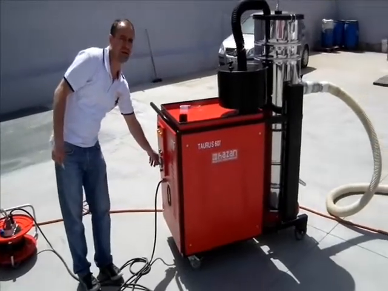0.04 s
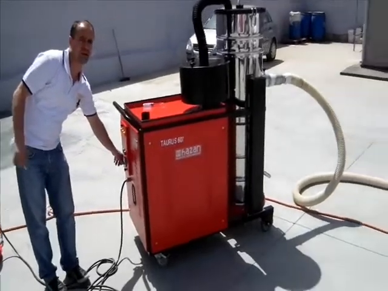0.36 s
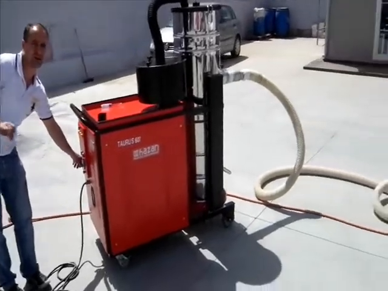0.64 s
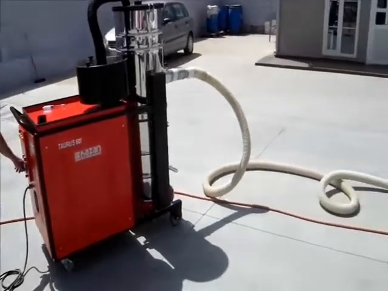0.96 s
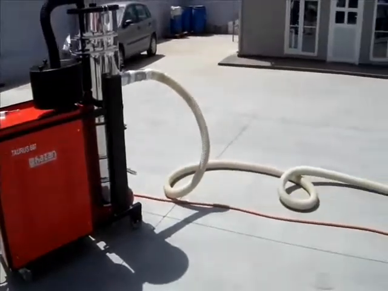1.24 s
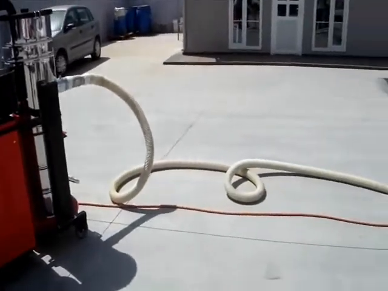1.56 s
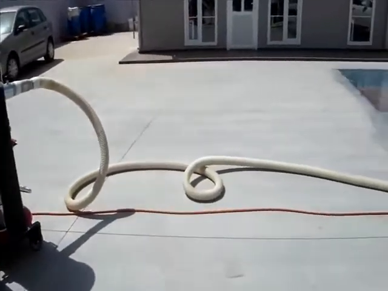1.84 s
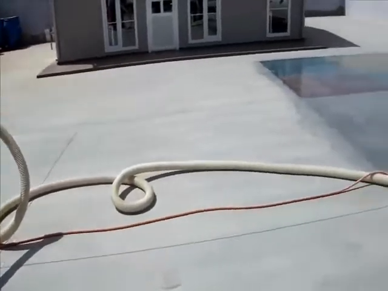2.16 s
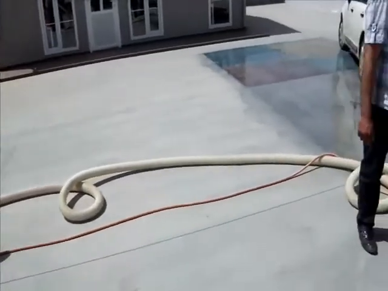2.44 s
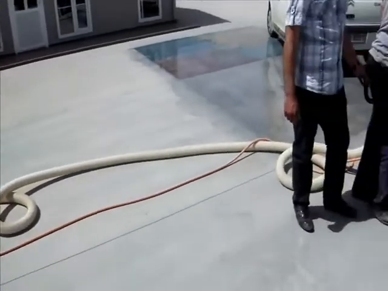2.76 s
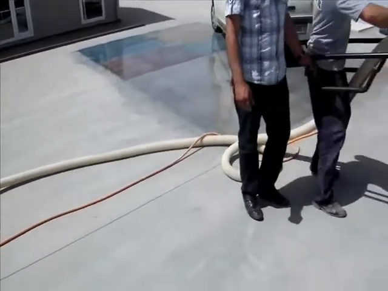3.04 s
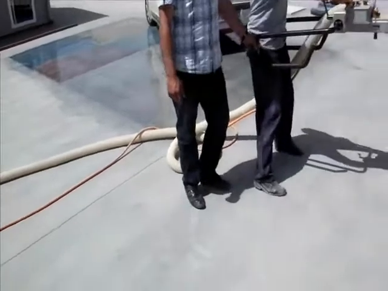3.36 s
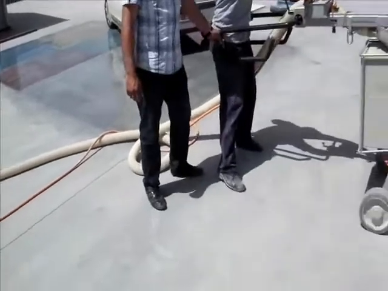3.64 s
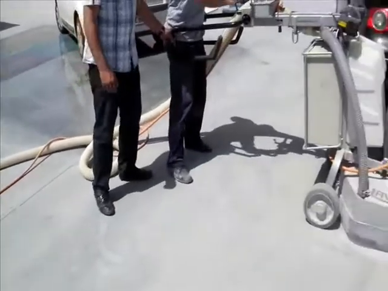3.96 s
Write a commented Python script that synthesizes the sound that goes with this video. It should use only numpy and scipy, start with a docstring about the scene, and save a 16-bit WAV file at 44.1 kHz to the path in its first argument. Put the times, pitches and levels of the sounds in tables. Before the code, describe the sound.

Floor grinder scraping and squealing over concrete, with the steady suction roar of an industrial vacuum.

```python
"""A floor grinder works a concrete yard while an industrial vacuum draws off the dust.
At first air rushes and moans in the hose over the grinder's rumble, and two faint notes fall away.
From 0.5 s the head bites in three spells, booming on the slab; its housing judders as the discs catch.
The carried microphone thuds softly as it pans from the vacuum to the grinder: the suction hiss fades,
and by 2 s the discs ring, rasp and squeal on the concrete under the thin whine of the drive."""
import sys
import numpy as np
from scipy import signal
from scipy.fft import rfft, irfft, next_fast_len
from scipy.io import wavfile
from scipy.ndimage import uniform_filter1d, map_coordinates

SR = 44100
rng = np.random.default_rng(int(sys.argv[2]) if len(sys.argv) > 2 else 0)


def materialize(psi):
    """Save the field psi as 16-bit PCM at rate SR to the path in sys.argv[1].

    A 1-D psi becomes a single channel; in a 2-D psi each row is a channel.
    """
    bounded = np.clip(np.atleast_2d(psi).T, -1, 1)
    quanta = np.round(bounded * 32767).astype(np.int16)
    wavfile.write(sys.argv[1], SR, quanta)


N = 176400
TIME_S = np.arange(N) / SR


def amp(db):
    """Decibels to gain."""
    return 10 ** (np.asarray(db) / 20)


def unit(x):
    """x at rms 1."""
    return x / np.sqrt(np.mean(x ** 2) + 1e-20)


def colour(points):
    """Response through (Hz, dB) points on a log axis."""
    points_hz, db = np.transpose(points)
    return lambda hz: amp(np.interp(np.log(hz + 1), np.log(points_hz + 1), db))


def resonances(modes):
    """Response of summed (Hz, width Hz, dB) modes."""
    return lambda f: sum(amp(db) * 1j * f * width / (hz * hz - f * f + 1j * f * width)
                         for hz, width, db in modes)


def steep_peak(hz, width_hz):
    """Response of two equal resonators in series."""
    return lambda f: resonances([(hz, width_hz, 0)])(f) ** 2


def curves(rows):
    """One value per sample for each column after the time."""
    times_s, *columns = np.transpose(rows)
    return [np.interp(TIME_S, times_s, column) for column in columns]


def wobble(rate_hz):
    """Smooth random curve, rate_hz knots a second."""
    knots = rng.standard_normal(int(N * rate_hz / SR) + 4)
    return map_coordinates(knots, [TIME_S * rate_hz])


def swell(peak_s, half_width_s):
    """Gaussian bump, 1 at peak_s."""
    return np.exp(-((TIME_S - peak_s) / half_width_s) ** 2)


def fuzzy_tone(hz, width_hz):
    """Tone of rms 1 whose pitch wanders quickly."""
    pitch_hz = hz + width_hz / 2 * wobble(2 * width_hz)
    return np.sqrt(2) * np.sin(2 * np.pi * (np.cumsum(pitch_hz) / SR + rng.random()))


def filtered(x, response):
    """x through a frequency response."""
    size = next_fast_len(N + SR // 2)
    return irfft(rfft(x, size) * response(np.fft.rfftfreq(size, 1 / SR)), size)[..., :N]


def shifted(x, hz):
    """x shifted in frequency by hz, one value per sample."""
    return np.real(signal.hilbert(x) * np.exp(2j * np.pi * np.cumsum(hz) / SR))


def rush(response, diffuse, patchy_db):
    """Stereo noise of rms 1 with patches of random gain; the diffuse share differs between channels."""
    spectra = signal.stft(rng.standard_normal((3, N)), nperseg=1024)[2]
    patches = uniform_filter1d(rng.standard_normal(spectra.shape[1:]), size=4, axis=0)
    patches = uniform_filter1d(patches, size=10, axis=1)
    noise = signal.istft(spectra * amp(patchy_db * unit(patches)), nperseg=1024)[1][:, :N]
    pair = np.sqrt(1 - diffuse) * noise[0] + np.sqrt(diffuse) * noise[1:]
    return unit(filtered(pair, response))


def placed(sound, lead_ms, left_db):
    """Mono or stereo sound with the left channel earlier by lead_ms and louder by left_db."""
    side = np.array([[0.5], [-0.5]])
    positions = np.arange(N) + side * lead_ms * SR / 1000
    pair = np.broadcast_to(sound, (2, N))
    delayed = [map_coordinates(channel, [at], mode="mirror") for channel, at in zip(pair, positions)]
    return np.array(delayed) * amp(side * left_db)


# Housing modes. Each row: frequency in Hz, width in Hz, gain in dB.
HOUSING_MODES = [(216, 16, -4.5), (254.3, 12.7, 2), (307, 80, -0.5), (393, 65, -1), (433, 13, 2.5),
                 (453, 11, -7)]
# Roll-off around the modes. Each row: frequency in Hz, gain in dB.
HOUSING_SKIRT = [(90, -18), (170, -6), (210, 3.5), (470, -3.5), (540, -9.5), (900, -32), (2000, -52)]


def housing(hz):
    """Response of the grinder's body."""
    return resonances(HOUSING_MODES)(hz) * colour(HOUSING_SKIRT)(hz)


# Rumble between bites. Each row: time in seconds, boom and housing gains in dB.
IDLE_LEVELS = [(0, -35.5, -36.5), (.3, -34, -31), (.54, -35, -27.5), (.6, -36.5, -26.5), (1.15, -37.5, -26),
               (1.42, -39.5, -30), (1.7, -42, -30.5), (1.9, -41.5, -28.5), (2.6, -41.5, -28.5),
               (2.85, -35, -28), (3.05, -38, -27), (3.2, -42, -30.5), (3.5, -41, -29), (3.85, -40.5, -27.5),
               (4, -40, -29)]
# Harder bites. Each row: start and end in seconds, boom and housing rises in dB.
BITES = [(0.526, 1.24, 6.5, -0.5), (1.77, 2.57, 8.5, 1.5), (3.274, 4.1, 10, 2)]
# Slab boom spectrum, then housing hum tones. Each row: frequency in Hz, gain in dB.
BOOM_SPECTRUM = [(30, -36), (55, -22), (68, -9.5), (78, -1), (95, -0.5), (120, -6), (170, -6), (230, -33),
                 (500, -62)]
HUM_TONES = [(215, -15), (252, -14), (385, -9), (437, -12)]


def rumble():
    """The head shakes its housing and booms on the slab; the boom rises while it bites."""
    ramp_s = 0.024
    boom_db, body_db = curves(IDLE_LEVELS)
    for start_s, end_s, boom_rise_db, body_rise_db in BITES:
        inside_s = np.minimum(TIME_S - start_s, end_s - TIME_S)
        bite = np.clip(inside_s / ramp_s + 0.5, 0, 1)
        boom_db += boom_rise_db * bite
        body_db += body_rise_db * bite
    boom = rush(colour(BOOM_SPECTRUM), diffuse=0.15, patchy_db=0.5)
    boom += amp(-7) * fuzzy_tone(79, width_hz=12)
    hum = sum(amp(db) * fuzzy_tone(hz, width_hz=13) for hz, db in HUM_TONES)
    flutter_db = 0.47 * wobble(24.63)
    body = rush(housing, diffuse=0.25, patchy_db=0.8) + hum
    sound = amp(boom_db - 1.5) * boom + amp(body_db - 0.16 + flutter_db) * body
    return placed(sound, lead_ms=0.03, left_db=3)


# Air rush. Each row: time in seconds, low and high band gains in dB.
AIR_LEVELS = [(0.0, -28.5, -30.5), (0.45, -30.5, -37.5), (0.62, -28, -34.5), (0.85, -31.5, -33.5),
              (1.08, -38.5, -32), (1.4, -37.5, -35.5), (1.72, -48, -35), (1.88, -29, -30), (2.15, -31, -30),
              (2.5, -33, -32.5), (2.9, -37, -35), (3.25, -35.5, -35.5), (3.35, -40, -31.5),
              (3.55, -33.5, -30.5), (3.7, -34, -32.5), (3.88, -29, -28.5), (4.0, -43, -35.5)]
# Suction hiss, fading with the pan. Each row: time in seconds, gain in dB.
SUCTION_LEVELS = [(0, -26), (.25, -25), (.6, -25.5), (1.1, -31.5), (1.6, -31.5), (4, -66)]
# Spectra of the two air bands and the hiss. Each row: frequency in Hz, gain in dB.
AIR_LOW_SPECTRUM = [(100, -20), (300, 0.5), (520, 2.5), (720, 0), (850, -6.5), (1300, -48)]
AIR_HIGH_SPECTRUM = [(550, -38), (780, 2), (900, 3), (1050, -2), (1250, -1.5), (1500, -4), (2200, -3.5),
                     (4000, -75)]
SUCTION_SPECTRUM = [(600, -12.5), (1200, 0), (1700, -0.5), (2200, -1.5), (2600, -0.5), (3100, -0.5),
                    (3700, -2.5), (4000, -1), (4400, 0), (4800, -7.5), (6500, -7), (7500, -22.5)]
# Hose resonances. Each row: frequency in Hz, width in Hz, gain in dB.
HOSE_MODES = [(723, 33, 2), (909, 61, 0), (1030, 42, -1.5)]


def vacuum():
    """Air rushes through the hose, sounds its resonances and hisses out of the machine."""
    low_db, high_db = curves(AIR_LEVELS)
    hiss_db, = curves(SUCTION_LEVELS)
    low = amp(low_db + 1) * rush(colour(AIR_LOW_SPECTRUM), diffuse=0.19, patchy_db=2)
    high = amp(high_db + 2) * rush(colour(AIR_HIGH_SPECTRUM), diffuse=0.62, patchy_db=3)
    hiss = amp(hiss_db + 2.5) * rush(colour(SUCTION_SPECTRUM), diffuse=0.98, patchy_db=3.5)
    hose = amp(high_db - 3.5) * rush(resonances(HOSE_MODES), diffuse=0.15, patchy_db=0.5)
    air = placed(low, lead_ms=0.21, left_db=2) + placed(high + hose, lead_ms=0.14, left_db=4)
    return air + placed(hiss, lead_ms=-0.11, left_db=4)


# Falling glide. Each row: time in seconds, base pitch in Hz, gain in dB.
FALLING_GLIDE = [(0, 144.2, -36.5), (.27, 143.8, -36), (.42, 136.5, -38), (.55, 130.5, -36),
                 (.68, 125.5, -41), (.9, 116, -56), (1.2, 113, -70)]
# The two notes. Each row: multiple of the base pitch, gain in dB.
FALLING_ORDERS = [(5, -6), (6, 0)]


def falling_notes():
    """Two faint notes glide down and vanish in the air rush."""
    base_hz, level_db = curves(FALLING_GLIDE)
    notes = sum(amp(db) * fuzzy_tone(order * base_hz, width_hz=7.9) for order, db in FALLING_ORDERS)
    return placed(amp(level_db) * notes, lead_ms=0.12, left_db=1)


# Disc ringing. Each row: time in seconds, low and high ring gains in dB.
RING_LEVELS = [(0.0, -41, -33), (0.4, -42, -31), (0.85, -35, -32), (1.08, -33.5, -29), (1.18, -32, -28.5),
               (1.4, -27.5, -25.5), (1.6, -31.5, -25.5), (1.8, -24.5, -24), (2.15, -29, -25),
               (2.5, -32, -26.5), (2.58, -26.5, -24.5), (2.7, -25.5, -23), (2.85, -28.5, -26),
               (2.97, -26, -26), (3.25, -28, -27), (3.45, -29.5, -28.5), (4.0, -33.5, -28.5)]
# Wander of the high ring. Each row: time in seconds, pitch in Hz.
RING_PITCH = [(0, 2230), (.7, 2190), (1.2, 2259), (2.5, 2240), (2.7, 2285), (3.0, 2252), (3.2, 2322),
              (3.4, 2225), (4, 2236)]
# Abrasive on concrete. Each row: time in seconds, rasp and fizz gains in dB.
ABRASION_LEVELS = [(0.0, -26, -45), (0.25, -27, -42.5), (0.6, -28.5, -38.5), (1.0, -28, -33),
                   (1.4, -26.5, -29.5), (1.75, -25, -28.5), (2.0, -25, -29), (2.26, -24.5, -28.5),
                   (2.36, -26.5, -30.5), (2.46, -25, -29.5), (2.7, -25, -29), (3.0, -23.5, -25.5),
                   (3.17, -25.5, -29.5), (3.45, -23.5, -28.5), (3.7, -24.5, -28.5), (4.0, -24, -31.5)]
# Abrasion spectra. Each row: frequency in Hz, gain in dB.
RASP_SPECTRUM = [(1200, -26), (1950, -4.5), (2550, -1.5), (3100, 1), (3400, 0), (3720, 0.5), (4050, -4.5),
                 (4400, -5.5), (4700, -19), (5600, -43)]
FIZZ_SPECTRUM = [(3500, -23), (4500, 2.5), (4900, 0), (5200, 1.5), (5400, 0), (5600, -0.5), (6000, -2),
                 (6600, -3), (7300, -10), (9000, -17), (14000, -15)]
# Direction of the discs. Each row: time in seconds, left lead in ms, base left-over-right in dB.
DISC_DIRECTION = [(0, 0.23, 12), (.6, 0.19, 16.5), (1.2, 0.23, 13), (1.35, 0.11, 13.5), (1.7, 0.075, 11),
                  (1.9, 0.026, 6.5), (2.3, 0.023, 7.5), (2.8, 0.067, 9.5), (3.15, 0.054, 8.5),
                  (3.4, 0.04, 7.5), (4, 0.039, 8.5)]


def grinding():
    """Abrasive scrapes the concrete in a fine uneven chatter and rings the discs."""
    low_hz, high_hz = 1687, 2248
    low_db, high_db = curves(RING_LEVELS)
    pitch_hz, = curves(RING_PITCH)
    rasp_db, fizz_db = curves(ABRASION_LEVELS)
    lead_ms, left_db = curves(DISC_DIRECTION)
    low = amp(low_db - 4) * rush(steep_peak(low_hz, width_hz=280), diffuse=0.32, patchy_db=1.5)
    high = amp(high_db - 2.5) * rush(steep_peak(high_hz, width_hz=325), diffuse=0.37, patchy_db=1.1)
    rings = low + shifted(high, pitch_hz - high_hz)
    rasp = amp(rasp_db + 2.5) * rush(colour(RASP_SPECTRUM), diffuse=0.42, patchy_db=1.5)
    fizz = amp(fizz_db + 0.63) * rush(colour(FIZZ_SPECTRUM), diffuse=0.3, patchy_db=2.7)
    chatter = amp(0.99 * wobble(220) + 0.29 * wobble(27))
    return chatter * (placed(rings, lead_ms, left_db + 4)
                      + placed(rasp, lead_ms, left_db - 3.5)
                      + placed(fizz, lead_ms, left_db + 2))


# Drive whine. Each row: time in seconds, gain in dB.
WHINE_LEVELS = [(0, -5), (1.05, -13), (1.4, -4), (1.75, 3), (2.05, 3), (2.5, 1), (3, 0), (3.45, 5), (4, 1)]


def drive_whine():
    """The thin, slightly unsteady tone of the drive in a halo of noise."""
    whine_hz, drift_hz = 5396, 4
    level_db, = curves(WHINE_LEVELS)
    tone = np.sin(2 * np.pi * np.cumsum(whine_hz + drift_hz * wobble(14)) / SR)
    flicker = amp([2.5 * wobble(11) for _ in range(2)])
    halo = amp(-0.5) * rush(steep_peak(whine_hz, width_hz=300), diffuse=0.17, patchy_db=-1.5)
    return placed(amp(level_db - 40) * (tone * flicker + halo), lead_ms=0.028, left_db=14)


# Top hiss spectrum. Each row: frequency in Hz, gain in dB.
TOP_HISS_SPECTRUM = [(13500, -40), (14400, -22), (14800, -6), (15300, -2), (15700, 0), (15900, -10)]


def top_hiss():
    """A thin steady hiss near 15.5 kHz."""
    hiss = amp(-42) * rush(colour(TOP_HISS_SPECTRUM), diffuse=0.46, patchy_db=4.5)
    return placed(hiss, lead_ms=0, left_db=9.5)


# Hose moans. Each row: peak time and half-width in seconds, pitch in Hz, level in dB.
MOANS = [(.04, 0.074, 719, -30), (.24, .05, 698, -35), (.6, 0.039, 560, -34.5), (1.9, .11, 905, -32),
         (2.13, 0.15, 1043, -35.5), (3.05, 0.19, 714, -40), (3.45, .14, 1015, -36.5)]


def hose_moans():
    """Now and then the air settles on one resonance of the hose."""
    moans = sum(amp(db) * swell(peak_s, width_s) * fuzzy_tone(hz, width_hz=22)
                for peak_s, width_s, hz, db in MOANS)
    return placed(moans, lead_ms=0.1, left_db=1)


# Abrasion surges. Each row: peak time and half-width in seconds, rasp and fizz levels in dB.
SURGES = [(.08, 0.037, -26, -49), (1.99, 0.025, -28, -33), (2.12, 0.016, -30, -28), (2.21, .012, -39, -31),
          (2.61, 0.043, -28, -50), (2.83, 0.04, -38, -29), (3.07, .035, -27, -45), (3.25, 0.046, -28, -27),
          (3.32, .03, -26, -34), (3.42, 0.028, -23, -26), (3.55, 0.036, -22, -31), (3.87, .03, -34, -43),
          (3.96, .03, -30, -30)]


def surges():
    """The abrasive digs in for a moment and scrapes louder."""
    rasp_gain = sum(amp(db) * swell(peak_s, width_s) for peak_s, width_s, db, _ in SURGES)
    fizz_gain = sum(amp(db) * swell(peak_s, width_s) for peak_s, width_s, _, db in SURGES)
    rasp = rasp_gain * rush(colour(RASP_SPECTRUM), diffuse=0.37, patchy_db=0.5)
    fizz = fizz_gain * rush(colour(FIZZ_SPECTRUM), diffuse=0.29, patchy_db=4)
    chatter = amp(1.7 * wobble(160))
    return chatter * placed(rasp + fizz, *curves(DISC_DIRECTION))


# Disc squeals. Each row: peak time and half-width in seconds, pitch in Hz, gain in dB.
SQUEALS = [(0.208, 0.04, 3070, -27), (0.39, 0.038, 2240, -27.5), (0.435, 0.025, 3490, -27.5),
           (.695, 0.024, 2060, -27), (1.176, 0.027, 2260, -25.5), (2.282, 0.027, 2360, -28),
           (2.681, 0.021, 1663, -27), (2.806, 0.045, 2265, -25.5), (3.24, 0.039, 2360, -28),
           (3.87, 0.046, 3090, -28)]


def disc_squeals():
    """The discs squeal in brief, rough tones."""
    squeals = sum(amp(db) * swell(peak_s, width_s) * fuzzy_tone(hz, width_hz=100)
                  for peak_s, width_s, hz, db in SQUEALS)
    roughness = amp(1.6 * wobble(90) + 0.5)
    return placed(squeals * roughness, *curves(DISC_DIRECTION))


# Microphone bumps. Each row: peak time in seconds, level in dB.
THUDS = [(.26, -43), (.46, -37), (1.27, -41), (1.78, -35), (2.27, -48), (2.78, -31), (3.77, -37)]


def microphone_thuds():
    """Soft low bumps as the microphone is carried, over a faint stir of air on its ports."""
    thud_hz, width_s = 42, 0.011
    thuds = sum(amp(db) * swell(peak_s, width_s) * np.sin(2 * np.pi * (thud_hz * TIME_S + rng.random()))
                for peak_s, db in THUDS)
    stir_response = colour([(20, -1), (45, 0), (120, -23), (500, -60)])
    stir = amp(-64) * rush(stir_response, diffuse=1, patchy_db=4)
    return placed(thuds, lead_ms=0, left_db=5) + stir


# Head judders. Each row: peak time and half-width in seconds, knock gain in dB,
# ring pitch in Hz, ring level in dB.
JUDDERS = [(0.596, .025, -20.5, 248.7, -24), (.635, 0.049, -26, 254, -25), (.69, 0.065, -32, 452, -27.5),
           (0.813, 0.016, -21.5, 435.5, -19.5), (.81, .045, -30, 212, -26), (.957, 0.031, -21, 224.3, -23),
           (1.098, 0.027, -20.5, 435, -21.5), (1.54, 0.03, -24, 218.6, -24.5),
           (1.855, .055, -32, 253, -24.5), (2.065, 0.072, -27, 257.7, -22), (2.15, 0.021, -24, 428.6, -29),
           (2.35, 0.019, -17.5, 437.4, -18), (2.36, 0.033, -30, 214.7, -27), (2.47, 0.052, -29, 432, -28.5),
           (2.54, 0.032, -27, 256, -28), (2.72, 0.044, -43, 250, -32.5), (2.83, .035, -40, 248, -30),
           (2.98, 0.031, -29, 381, -33), (3.28, 0.023, -31, 360, -29.5), (3.48, 0.036, -28, 316.6, -29),
           (3.605, .035, -20, 240, -24), (3.66, .05, -34, 218, -25.5), (3.76, 0.036, -30, 435, -31),
           (3.83, 0.026, -29, 310, -31), (3.89, .04, -26, 447, -28.5)]


def judders():
    """Short runs of uneven knocks as the discs catch, each with one swelling ring of the housing."""
    knock_rate_hz, scatter_periods = 107.8, 0.16
    beats = np.arange(-6, 7)
    knocks, ring = np.zeros(N), np.zeros(N)
    for peak_s, width_s, knock_db, ring_hz, ring_db in JUDDERS:
        offsets_s = (beats + scatter_periods * rng.standard_normal(len(beats))) / knock_rate_hz
        samples = np.clip((peak_s + offsets_s) * SR, 0, N - 1).astype(int)
        strengths = amp(knock_db) * np.exp(-2 * (offsets_s / width_s) ** 2)
        np.add.at(knocks, samples, strengths)
        ring += amp(ring_db) * swell(peak_s, width_s) * fuzzy_tone(ring_hz, width_hz=12)
    return placed(amp(43) * filtered(knocks, housing) + ring, lead_ms=0.03, left_db=2.5)


# Disc scuffs. Each row: peak time and half-width in seconds, level in dB.
SCUFFS = [(2.772, 0.018, -26), (3.06, 0.035, -26), (3.338, 0.021, -23.5), (3.627, 0.023, -29.5),
          (3.88, 0.02, -27)]
# Scuff spectrum. Each row: frequency in Hz, gain in dB.
SCUFF_SPECTRUM = [(250, -1), (500, 9.5), (900, 2), (1400, 3), (2000, -21), (3200, 4), (5000, -31)]


def disc_scuffs():
    """The discs scuff the slab in short broad bursts."""
    lead_ms, _ = curves(DISC_DIRECTION)
    gain = sum(amp(db) * swell(peak_s, width_s) for peak_s, width_s, db in SCUFFS)
    scuffs = gain * rush(colour(SCUFF_SPECTRUM), diffuse=0.14, patchy_db=-1.5)
    return placed(scuffs, lead_ms, left_db=4)


def scene():
    """Both machines running together."""
    running = rumble() + vacuum() + falling_notes() + grinding() + drive_whine() + top_hiss()
    events = hose_moans() + surges() + disc_squeals() + microphone_thuds() + judders() + disc_scuffs()
    return running + events


# Treble dip. Each row: frequency in Hz, gain in dB.
TREBLE_DIP = [(7000, 0), (7380, -2), (7800, -22), (9000, -18), (9800, -11), (11000, -17), (13500, -21),
              (14600, 0)]
BAND_LIMIT_HZ = 15950


def record(dry):
    """The treble is dulled between about 7.5 and 14 kHz; nothing passes above the band limit."""
    return filtered(dry, lambda hz: colour(TREBLE_DIP)(hz) * (hz < BAND_LIMIT_HZ))


dry = scene()
out = record(dry)
materialize(out)
```